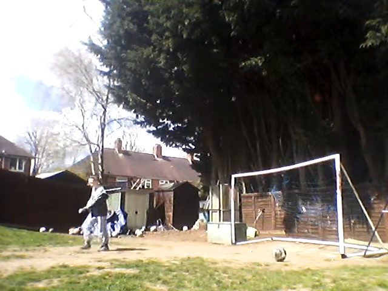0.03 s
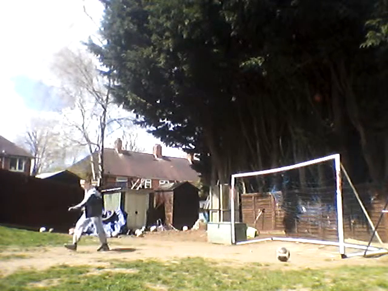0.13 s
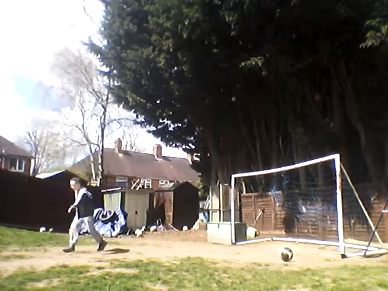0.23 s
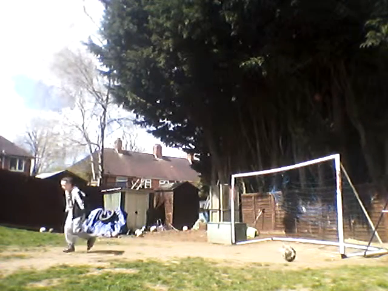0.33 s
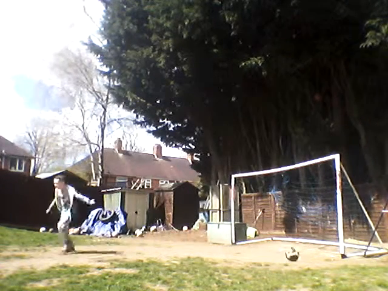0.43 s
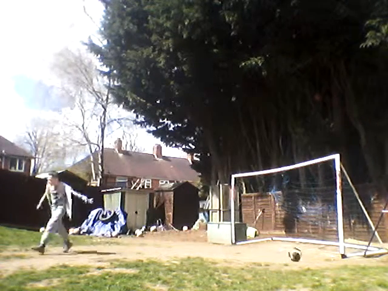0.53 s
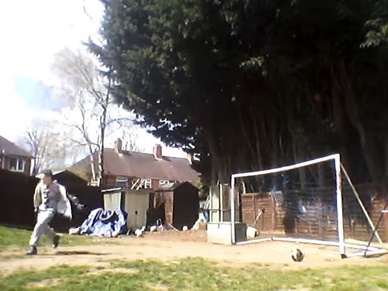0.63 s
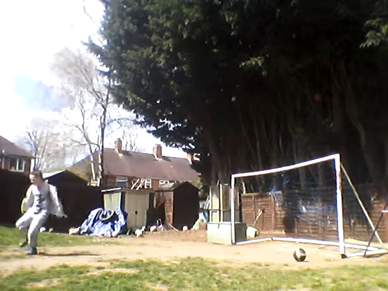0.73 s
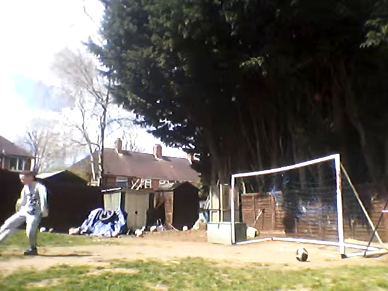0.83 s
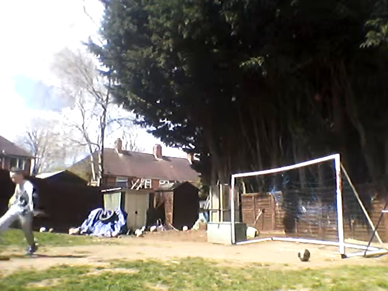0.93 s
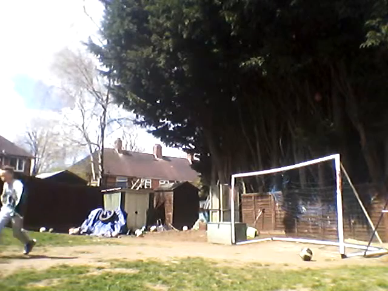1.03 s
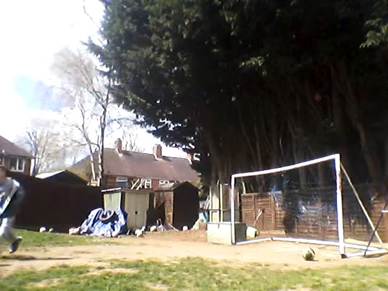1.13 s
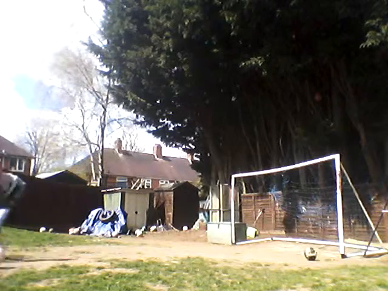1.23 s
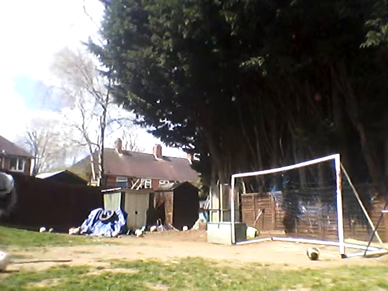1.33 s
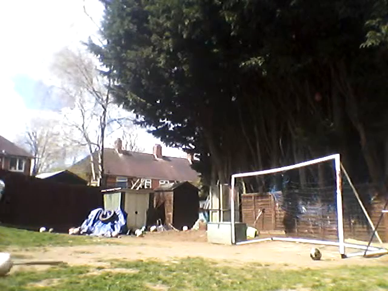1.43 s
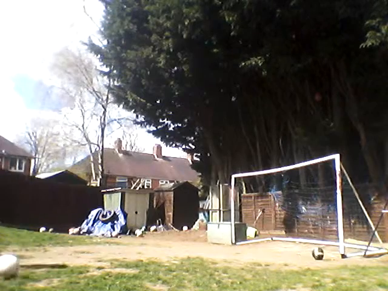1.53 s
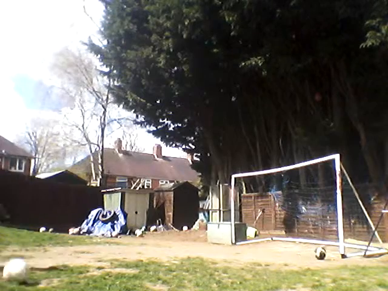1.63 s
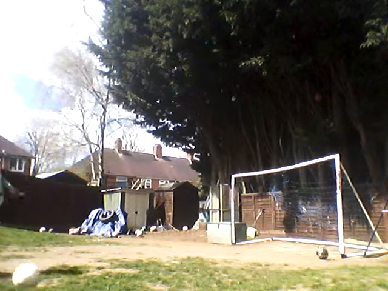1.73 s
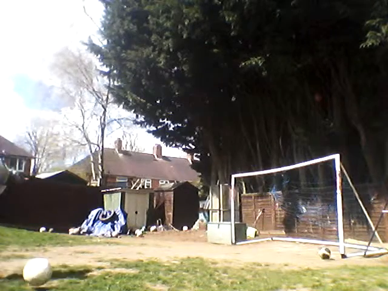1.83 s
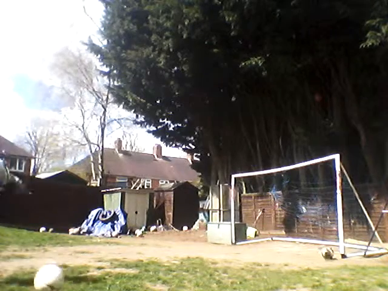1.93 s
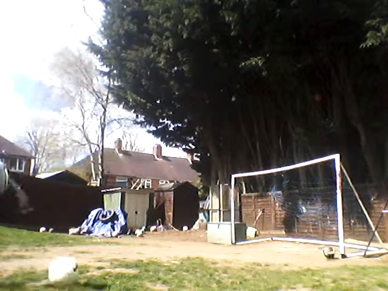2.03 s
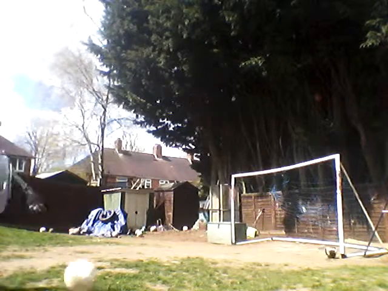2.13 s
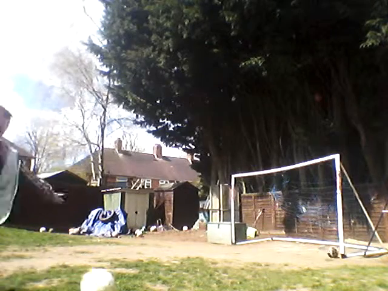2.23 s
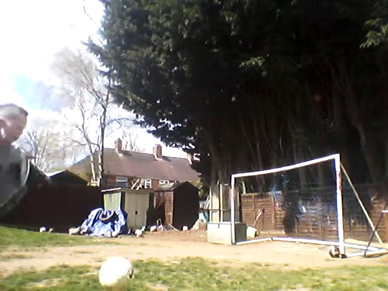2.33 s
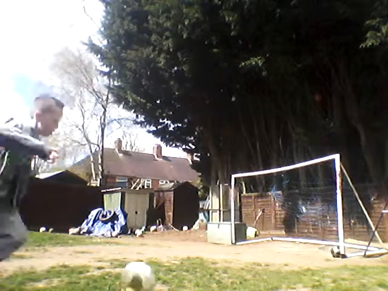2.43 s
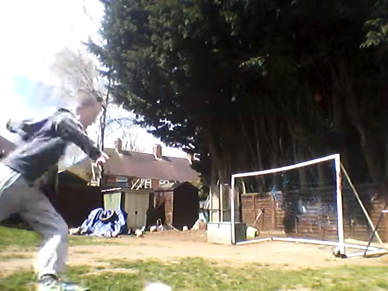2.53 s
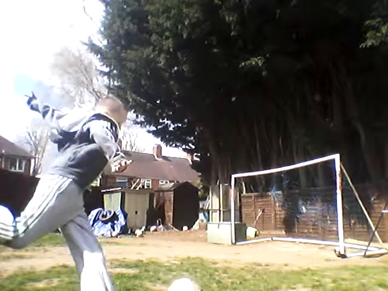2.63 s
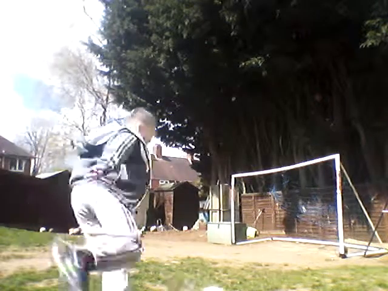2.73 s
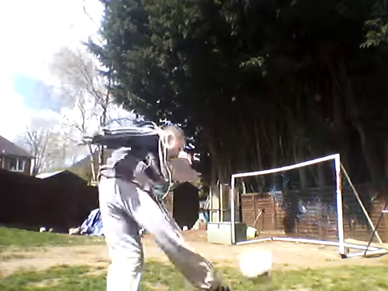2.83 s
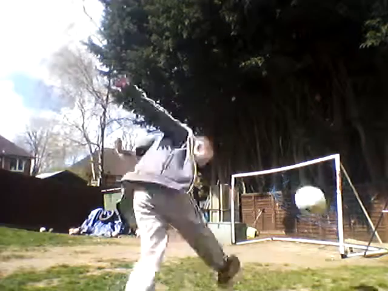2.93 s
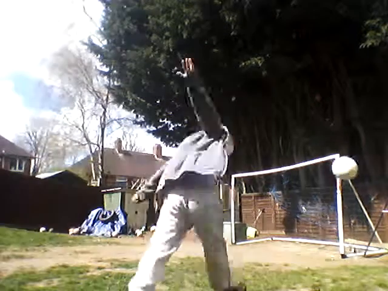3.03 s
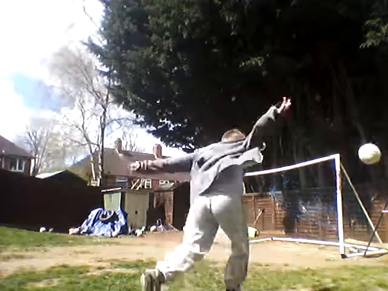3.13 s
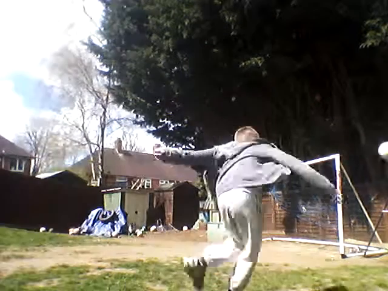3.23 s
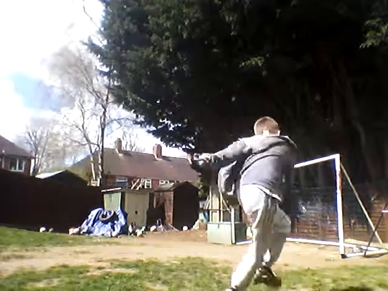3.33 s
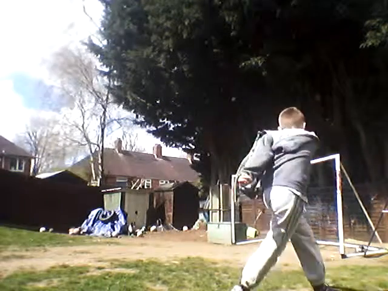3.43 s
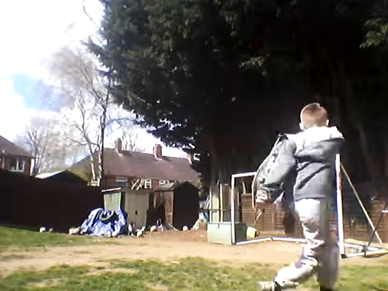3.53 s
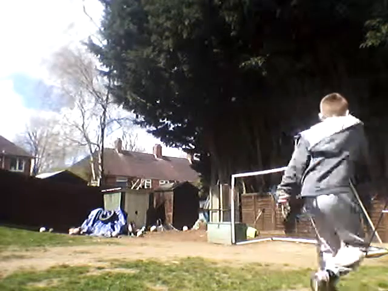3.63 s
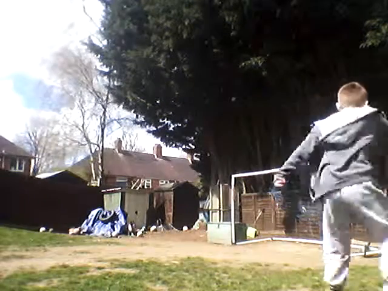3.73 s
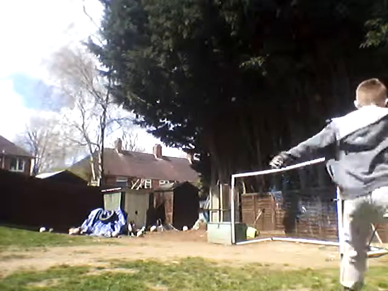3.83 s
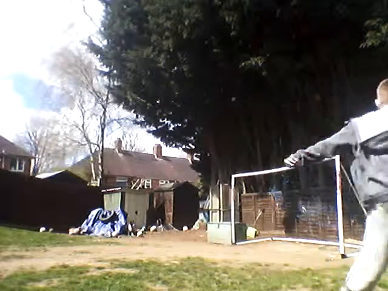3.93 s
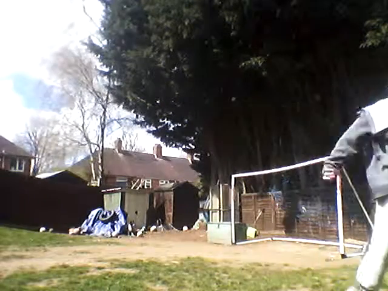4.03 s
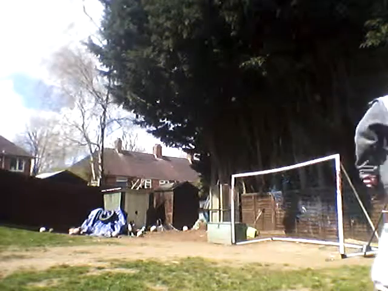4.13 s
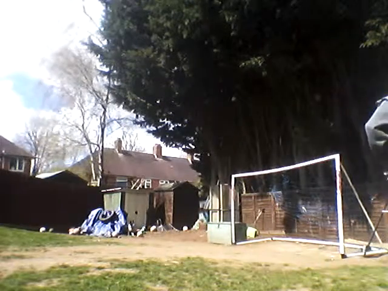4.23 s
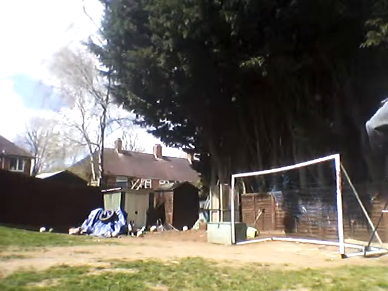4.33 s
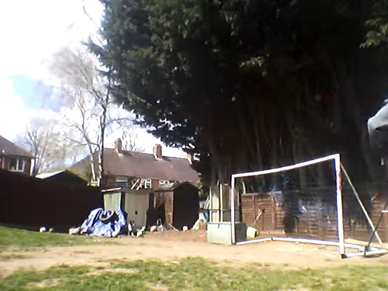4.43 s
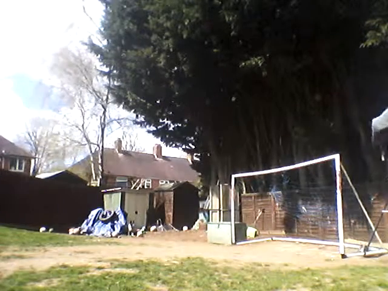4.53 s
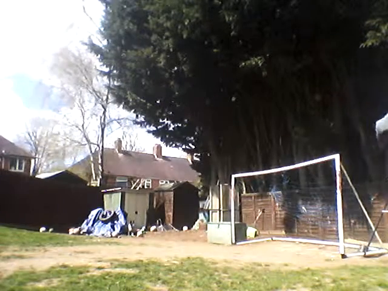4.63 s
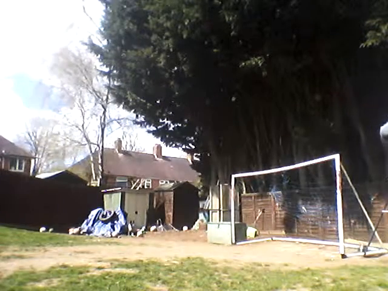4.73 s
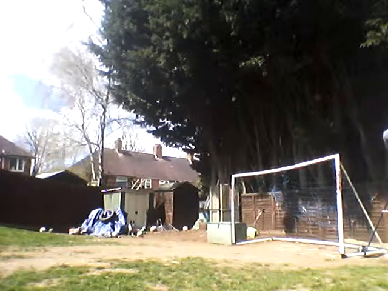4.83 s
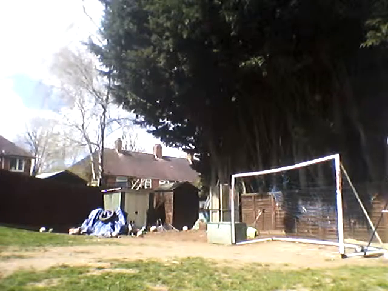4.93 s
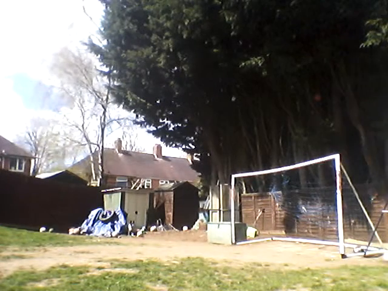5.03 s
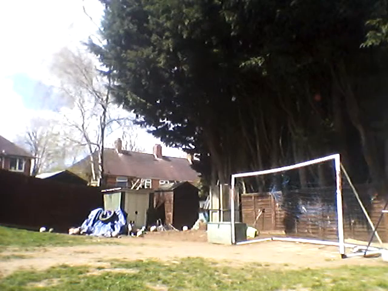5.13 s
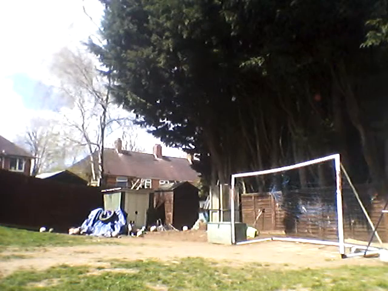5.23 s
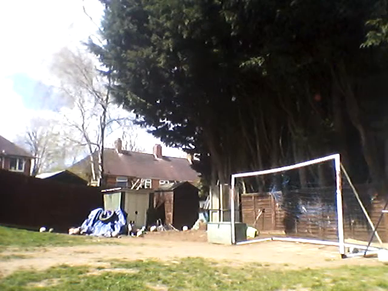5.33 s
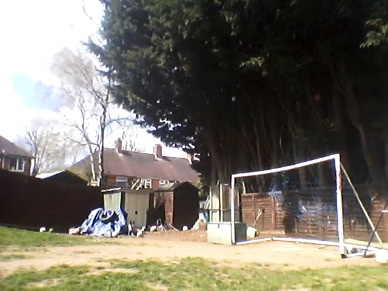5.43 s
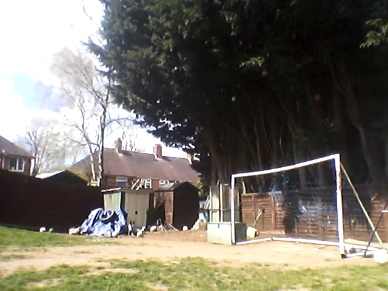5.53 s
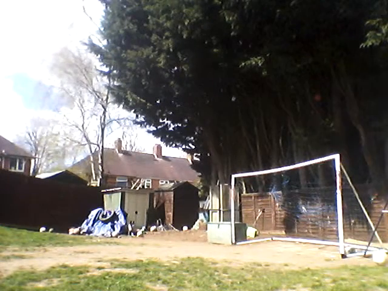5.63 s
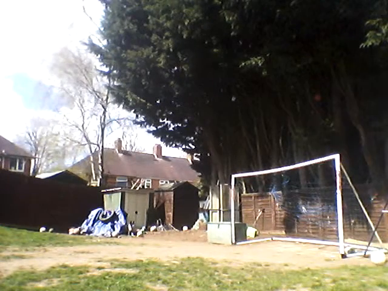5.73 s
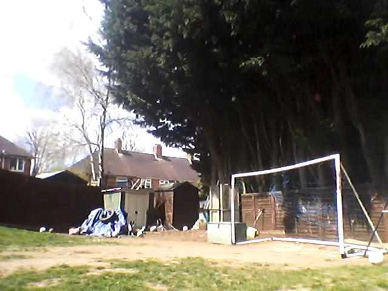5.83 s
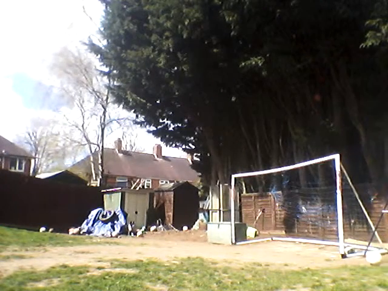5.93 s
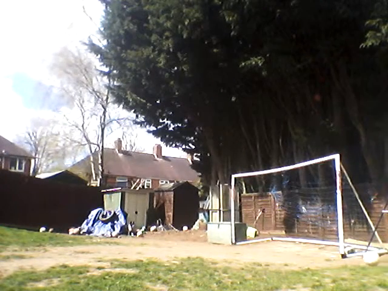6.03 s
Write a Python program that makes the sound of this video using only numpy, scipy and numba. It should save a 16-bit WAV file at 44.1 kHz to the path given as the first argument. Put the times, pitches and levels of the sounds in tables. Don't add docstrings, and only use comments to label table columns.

```python
import sys
import numpy as np
from scipy import signal
from scipy.fft import rfft, irfft, next_fast_len
from scipy.io import wavfile
from scipy.ndimage import uniform_filter1d
from numba import njit

SR = 44100
rng = np.random.default_rng(int(sys.argv[2]) if len(sys.argv) > 2 else 0)


def voltage_ratio(level):
    return 10 ** (np.asarray(level, float) / 20)


def digitize_waveform(pressure):
    field = np.atleast_2d(pressure).T
    bounded = np.clip(field, -1, 1)
    quanta = np.round(bounded * 32767).astype(np.int16)
    wavfile.write(sys.argv[1], SR, quanta)


N = 267246

# freq_hz, density_db
HUM_TONE = [(76, -60), (130, -8), (232, 1), (348, -3.5), (698, -1.5), (1010, -4.5), (1350, -9), (2250, -19),
            (3000, -20.5), (3900, -38), (6600, -120)]
# freq_hz, density_db
RUMBLE_TONE = [(12, -68), (20, -20), (49, -11), (160, 1.5), (210, -23), (350, -120)]
# freq_hz, density_db
HISS_TONE = [(880, -71), (1500, 2.5), (2250, -14.5), (4720, -6), (6610, -6.5), (8500, -3), (13900, -1.5),
             (14600, -7.5), (15000, -52)]
# time_s, rustle_db
STIR = [(0.0, -71.5), (.3, -55), (.62, -65.5), (1.0, -53.5), (1.6, -49), (1.96, -56.5), (2.36, -52.5),
        (2.8, -52), (2.92, -44), (3.05, -41), (3.27, -49.5), (3.43, -53), (3.6, -57.5), (4.23, -52.5),
        (4.42, -56.5), (5.3, -53.5), (5.84, -59.5), (6.06, -50.5)]
# start_s, length_s, from_hz, to_hz, level_db
WHISTLES = [
    (.632, .08, 4050, 4050, -64),
    (5.25, .175, 3980, 4950, -60),
]
# freq_hz, density_db
GRASS_TONE = [(470, -18), (800, -3), (1290, -5.5), (1600, -5), (1830, -4), (2650, -2.5), (3020, -2.5),
              (4650, -1.5), (5310, -5), (6280, -15.5), (14000, -33)]
# start_s, level_db, t60_s
TREADS = [(0.192, -32, 0.093), (.204, -42.5, 0.24), (.631, -47, 0.065), (0.9345, -28, 0.12),
          (1.0744, -43.5, 0.088), (1.405, -43, .051), (1.7632, -42, 0.04), (1.8162, -42.5, 0.25),
          (2.289, -38, 0.17), (2.325, -34.5, 0.33), (2.525, -40, 0.082), (5.208, -35, .05),
          (2.705, -30, 0.022), (2.712, -27.5, 0.14), (2.772, -38, 0.11), (2.81, -27.5, 0.031),
          (2.878, -12.5, 0.071), (3.054, -41, 0.048), (3.3096, -41.5, 0.044), (3.5214, -35.5, 0.1),
          (3.538, -36, 0.18), (3.776, -33, 0.061), (4.159, -31.5, 0.23), (4.8507, -51, 0.065),
          (5.0324, -46, .06), (5.4008, -47, .05), (5.999, -35.5, 0.15)]
# start_s, level_db, t60_s
FLICKS = [(0.344, -47.5, 0.065), (.632, -46, 0.054), (0.95, -24, 0.11), (0.9605, -22, 0.044),
          (0.9805, -32.5, 0.23), (1.1802, -30, 0.11), (1.362, -42, 0.14), (1.4348, -46.5, 0.1),
          (2.024, -35.5, 0.12), (2.0485, -44, 0.11), (2.131, -47, 0.084), (2.179, -46.5, 0.034),
          (2.344, -29.5, 0.061), (2.359, -35, 0.13), (2.606, -34.5, 0.077), (2.732, -33, 0.059),
          (2.749, -34, .05), (2.8775, -13, .026), (3.112, -47, 0.24), (3.763, -49, 0.05),
          (4.9754, -44, 0.17), (5.113, -64, 0.081), (5.3423, -45, 0.049), (5.3533, -43, 0.048)]
# start_s, level_db, hold_s, dull_share_db, bright_centre_hz
SWISHES = [(0.653, -52, 0.028, 6.5, 3970), (1.225, -49.5, 0.035, -1, 5400), (1.469, -43.5, 0.03, -7, 4680),
           (1.532, -50, 0.043, -7, 4350), (1.608, -36.5, .05, 4.5, 4700), (1.988, -42, 0.027, 6, 4800),
           (2.3, -43.5, .03, 6, 4800), (2.542, -41.5, 0.014, 5, 4540), (2.721, -39.5, 0.048, 3, 4460),
           (2.778, -38, 0.0067, 0.5, 3380), (2.951, -39, .04, 8.5, 3170), (2.995, -39.5, 0.049, 11.5, 3300),
           (3.145, -39, 0.022, 3, 5230), (3.158, -47.5, 0.027, -8, 8600), (3.567, -50, 0.023, 8.5, 4930),
           (3.62, -47.5, 0.007, 2, 3480), (3.943, -36.5, 0.052, 6, 3500), (4.193, -44, 0.029, 6, 5140),
           (4.246, -51.5, 0.021, 3, 5200), (5.16, -46, .01, 5, 5000), (5.18, -43.5, 0.015, 3.5, 4620),
           (5.858, -57, 0.042, 7, 4470), (6.02, -50, .03, 4, 4000)]
# start_s, crack_db, boom_db, rattle_db, rattle_t60_s
BLOWS = [
    (3.7874, -12, -14.5, -25, 0.45),
    (3.8155, -4, -12, -19, 0.51),
    (3.844, -29, -21, -33.5, 0.067),
    (3.875, -22.5, -26, -29.5, 0.43),
    (3.92, -26, -21.5, -33, 0.17),
    (3.978, -25.5, -27.5, -39.5, 0.39),
]
# freq_hz, level_db, t60_s
PANEL_MODES = [(296, -9, .14), (366, -0.5, 0.18), (443, -1, 0.13), (502, -1, 0.086), (585.6, -1, 0.19),
               (663, -9, 0.15), (675, -15, 0.1), (850, -24, 0.08), (1165, -5, 0.065), (1740, -13, .04),
               (2340, -10, 0.04), (2830, -2, 0.067), (4700, -19, 0.03)]
# freq_hz, width_hz, level_db
SLATS = [(1940, 170, -5.5), (2800, 740, -0.5), (4740, 1600, -5)]
# freq_hz, density_db
RATTLE_TONE = [(130, -39), (220, -34), (276, -1), (319, -17), (363, -8), (553, -18.5), (640, -3),
               (1410, -11.5), (1830, -7.5), (2260, -13), (3020, -9), (7980, -29), (9840, -38), (10500, -79),
               (13600, -99), (22000, -120)]
# start_s, peak_db, pitch_hz, turf_rumble_db
FOOTFALLS = [(.193, -43, 1320, -6), (.575, -50.5, 290, 1), (0.654, -46, 774, 2.5), (.883, -52, 390, -13),
             (1.074, -35.5, 800, -11.5), (1.209, -36, 970, -12), (1.665, -42.5, 490, 1),
             (1.819, -37, 620, -13), (2.01, -33, 694, -9), (2.049, -33.5, 615, -13),
             (2.291, -33, 690, -4.5), (2.313, -32.5, 780, -8.5), (2.341, -20, 635, -8.5),
             (2.371, -43, 587, -7.5), (2.447, -43.5, 620, -1), (2.626, -41, 670, -10),
             (2.605, -23.5, 740, -19), (2.702, -30, 606, -11), (2.711, -24, 920, -4),
             (2.734, -29.5, 606, -12), (2.79, -30, 850, -21), (2.808, -17.5, 790, -20),
             (3.108, -31, 483, -7), (3.176, -36.5, 646, -9), (3.305, -38.5, 620, -9), (3.522, -28, 660, -5),
             (3.538, -24, 670, -15.5), (4.974, -31, 660, -6.5), (4.984, -29.5, 675, -10),
             (5.034, -46, 663, 1.5)]
# start_s, peak_db, pitch_hz, turf_rumble_db, rumble_t60_s
BALL = [(.937, -14, 685, -11, 0.12), (.959, -26.5, 790, -7.5, .3), (1.179, -26, 675, -10, 0.14),
        (2.023, -24, 630, -12.5, .11), (2.878, -4.5, 470, -6, 0.048), (2.891, -2.5, 542, -10.5, 0.07),
        (2.907, -21, 580, -7, 0.065), (2.929, -22, 585, -10, 0.12), (2.948, -31, 630, -3, .1),
        (2.965, -27.5, 445, -0.5, 0.09), (2.982, -29.5, 515, 3, 0.083), (2.997, -31, 432, -9, 0.035),
        (4.163, -24, 506, -3.5, 0.11), (4.219, -34.5, 500, -7, .1), (4.259, -35, 550, -4.5, 0.17),
        (4.664, -38, 520, -9, 0.53), (5.997, -32, 520, -7.5, 0.12)]
# start_s, peak_db,
# pitch_hz, contact_s
KNOCKS = [(0.641, -57.5, 1760, .03), (2.341, -32, 172, 0.003), (2.341, -18, 1320, 0.00018),
          (2.7108, -20, 1450, 0.00069), (2.876, -12.5, 92, 0.0047), (3.784, -11, 3240, 0.0003),
          (2.877, -16, 270, 0.0038), (3.788, -22.5, 431, 0.011), (3.8125, -9, 4700, 0.00084),
          (3.816, -9.5, 624.3, 0.013), (3.817, -17.5, 399, .014), (3.976, -36, 376, 0.02),
          (3.977, -32, 614, 0.0093), (4.161, -38, 182, 0.003), (4.667, -45, 368.6, 0.033),
          (4.672, -41, 694, 0.017)]


def level(x, db=0):
    return x * voltage_ratio(db) / np.sqrt(np.mean(x ** 2, axis=-1, keepdims=True))


def colour(x, tone):
    hz, db = np.transpose(tone)
    size = next_fast_len(x.shape[-1])
    bins_hz = np.arange(size // 2 + 1) * SR / size + 1
    gain = voltage_ratio(np.interp(np.log(bins_hz), np.log(hz), db))
    return level(irfft(rfft(x, size) * gain, size)[..., :x.shape[-1]])


def band(x, lo_hz, hi_hz):
    sos = signal.butter(2, [lo_hz, hi_hz], "bandpass", fs=SR, output="sos")
    return level(signal.sosfilt(sos, x))


def highpass(x, hz):
    return signal.sosfilt(signal.butter(3, hz, "highpass", fs=SR, output="sos"), x)


def fade(t, t60):
    return np.exp(-np.log(1000) * t / np.maximum(t60, .002))


def walk(rate_hz):
    hold = int(SR / rate_hz)
    steps = np.repeat(rng.standard_normal(N // hold + 1), hold)
    return level(uniform_filter1d(uniform_filter1d(steps, hold), hold)[:N])


def crackle(shape, spread_db):
    snap = np.minimum(rng.exponential(size=shape), 4)
    return rng.standard_normal(shape) * voltage_ratio(spread_db * snap)


def add(track, s, piece):
    i = int(s * SR)
    track[i:i + len(piece)] += piece[:N - i]


def hum_and_hiss(stir_db):
    hum_db = -55 + 0.24 * (stir_db + 57)
    hum = colour(rng.standard_normal(N), HUM_TONE) * voltage_ratio(hum_db + 1.2 * walk(4.0))
    rumble = colour(rng.standard_normal(N), RUMBLE_TONE) * voltage_ratio(-66.5 + 2.0 * walk(5.4))
    hiss = colour(rng.standard_normal(N), HISS_TONE) * voltage_ratio(-64.5)
    return hum + rumble + hiss


def bird():
    out = np.zeros(N)
    hoarse = voltage_ratio(4 * walk(60)) * (.7 + .5 * walk(400))
    for s, length, from_hz, to_hz, db in WHISTLES:
        t = np.arange(int(length * SR)) / SR
        edge = np.clip(np.minimum(t, length - t) / 0.023, 0, 1) ** 2
        sag = voltage_ratio(-5 * t / length)
        hz = from_hz + (to_hz - from_hz) * (t / length) ** 1.4
        add(out, s, voltage_ratio(db) * edge * sag * np.sin(2 * np.pi * np.cumsum(hz) / SR))
    return out * hoarse


@njit
def walls(x, lags, gain, damp):
    line, soft, out = np.zeros((8, 8192)), np.zeros(8), np.zeros(len(x))
    for i in range(len(x)):
        total = 0.
        for k in range(8):
            soft[k] += (1 - damp) * (gain[k] * line[k, (i - lags[k]) & 8191] - soft[k])
            total += soft[k]
            out[i] += soft[k] * (1 - 2 * (k % 2))
        for k in range(8):
            line[k, i & 8191] = x[i] + soft[k] - total / 4
    return out


def garden_echo(play):
    t60_s, damp, echo_db = 0.36, 0.6, -16.5
    lags = rng.integers(700, 5000, 8)
    gain = voltage_ratio(-60 * lags / SR / t60_s)
    return voltage_ratio(echo_db) * walls(play + 1e-18, lags, gain, damp)


def rustle(stir_db):
    return colour(crackle(N, spread_db=5.0), GRASS_TONE) * voltage_ratio(stir_db - 5.5 + 1.4 * walk(25.0))


def scuffs():
    out, t = np.zeros(N), np.arange(int(.3 * SR)) / SR
    tread_dull_db, flick_dull_db, split_hz = 5.5, -24, 2850
    snap_rise_s, swish_rise_s, swish_t60_s = 0.0011, .026, .17
    brushes = [(s, db, tread_dull_db, snap_rise_s, 0, t60, None) for s, db, t60 in TREADS]
    brushes += [(s, db, flick_dull_db, snap_rise_s, 0, t60, None) for s, db, t60 in FLICKS]
    brushes += [(s, db, dull_db, swish_rise_s, hold, swish_t60_s, hz)
                for s, db, hold, dull_db, hz in SWISHES]
    stalks = colour(crackle((len(brushes), len(t)), spread_db=3.5), GRASS_TONE)
    dull = band(stalks, 670, 1.29 * split_hz)
    bright = band(stalks, split_hz, 14000)
    tufts = np.tile(voltage_ratio(2.0 * walk(160)), 2)
    for (s, db, dull_db, rise, hold, t60, centre_hz), low, high in zip(brushes, dull, bright):
        if centre_hz is not None:
            high = level(1.64 * high + band(high, centre_hz / 1.24, centre_hz * 1.294))
        shape = np.minimum(t / rise, 1) * fade(np.maximum(t - rise - hold, 0), t60)
        shape = shape * tufts[int(s * SR):][:len(t)]
        add(out, s, shape * voltage_ratio(db) * (voltage_ratio(-4.5) * high + voltage_ratio(dull_db - 8.5) * low))
    return out


def fence(contact_t60=0.034, crack_t60=0.03, shake_db=-19):
    out, t = np.zeros(N), np.arange(int(.7 * SR)) / SR
    knocks = crackle((len(BLOWS), len(t)), spread_db=2.0)
    panel = sum(voltage_ratio(db) * np.sin(2 * np.pi * hz * t) * fade(t, t60) for hz, db, t60 in PANEL_MODES)
    clumps = voltage_ratio(2.5 * walk(180))
    for (s, crack_db, boom_db, rattle_db, rattle_t60), knock in zip(BLOWS, knocks):
        shake = fade(t, rattle_t60) * np.minimum(t / 0.012, 1) * clumps[int(s * SR):][:len(t)]
        drive = knock * (fade(t, contact_t60) + voltage_ratio(shake_db) * shake)
        ring = signal.fftconvolve(drive, panel)[:len(t)]
        boom = ring / np.abs(ring).max()
        slats = sum(voltage_ratio(db) * band(knock, hz - wide / 2, hz + wide / 2) for hz, wide, db in SLATS)
        crack = level(slats + 1.5 * band(colour(knock, GRASS_TONE), 1100, 15000))
        crack = crack * fade(t, crack_t60) * np.minimum(t / 0.0019, 1)
        rattle = band(colour(knock[::-1], RATTLE_TONE), 197, 15000) * shake
        add(out, s, voltage_ratio(boom_db) * boom + voltage_ratio(crack_db) * crack + voltage_ratio(rattle_db) * rattle)
    return highpass(out, 235)


def thuds():
    out, t = np.zeros(N), np.arange(int(.4 * SR)) / SR
    contact_turns = .68
    rumble_t60_s, knock_rumble_db, turf_low_hz = 0.12, -32, 270

    def foot_t60(db):
        return rumble_t60_s - 0.0039 * (db + 43.5)

    hits = [(s, db, hz, contact_turns / hz, rumble_db, t60) for s, db, hz, rumble_db, t60 in BALL]
    hits += [(s, db, hz, contact_turns / hz, rumble_db, foot_t60(db)) for s, db, hz, rumble_db in FOOTFALLS]
    hits += [(s, db, hz, contact, knock_rumble_db, rumble_t60_s) for s, db, hz, contact in KNOCKS]
    soils = rng.standard_normal((len(hits), len(t)))
    late = t - .004
    for (s, db, hz, contact, rumble_db, t60), soil in zip(hits, soils):
        press = min(.8 * contact, .0016)
        spread = np.where(late < 0, press, 1.1 * contact)
        swing = np.cos(2 * np.pi * hz * late) * np.exp(-.5 * (late / spread) ** 2)
        top_hz = max(1.634 * hz, 2 * turf_low_hz)
        turf = band(band(soil, turf_low_hz, top_hz), turf_low_hz, top_hz)
        turf = turf * np.clip(late / (3 * press), 0, 1) * fade(t, t60)
        add(out, s, voltage_ratio(db + 1.0) * (swing + voltage_ratio(rumble_db) * turf))
    return out


def scene():
    stir_db = np.interp(np.arange(N) / SR, *np.transpose(STIR))
    air = hum_and_hiss(stir_db) + bird()
    play = scuffs() + fence() + thuds()
    near = highpass(play + garden_echo(play) + rustle(stir_db), 170)
    return np.tile(near + air, (2, 1))


def band_limit(x):
    return signal.sosfilt(signal.butter(12, 15620, fs=SR, output="sos"), x)


def record(dry):
    mask_db, mask_top_db, mask_from_hz = -45.5, -83.5, 10200
    lowpass = signal.ellip(6, .2, 60, 14800, fs=SR, output="sos")
    heard = signal.sosfilt(lowpass, np.clip(dry[0], -1, 1))
    hz, _, cells = signal.stft(heard, SR, nperseg=2048)
    power = np.abs(cells) ** 2
    mask = np.minimum(power[hz > 900].sum(0) * voltage_ratio(mask_db) ** 2, voltage_ratio(mask_top_db) ** 2)
    mask = np.maximum(mask, 0.083 * np.roll(mask, 1))
    faint = uniform_filter1d(power, size=5, axis=0) < mask
    covered = faint & (hz[:, None] > mask_from_hz)
    kept = signal.istft(np.where(covered, 0, cells), SR, nperseg=2048)[1][:N]
    return band_limit(np.tile(kept, (2, 1)))


dry = scene()
out = record(dry)
digitize_waveform(out)
```